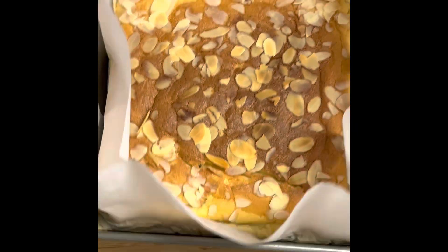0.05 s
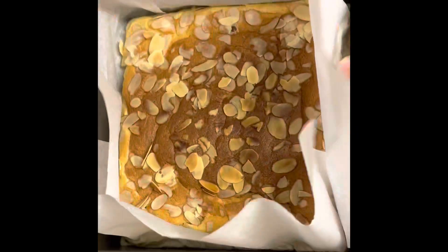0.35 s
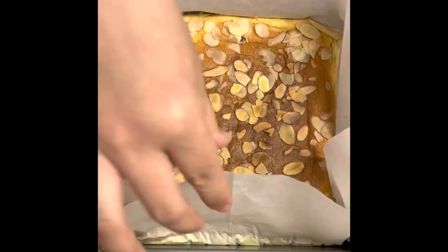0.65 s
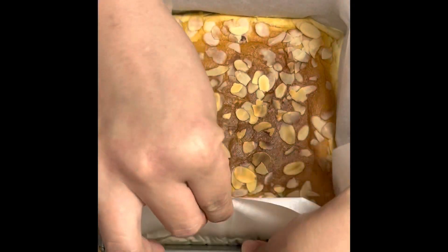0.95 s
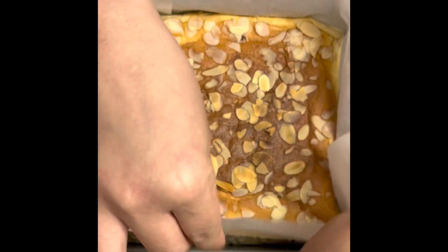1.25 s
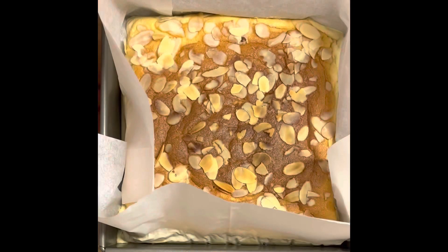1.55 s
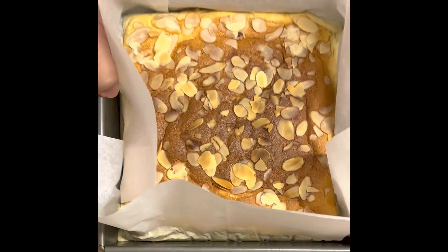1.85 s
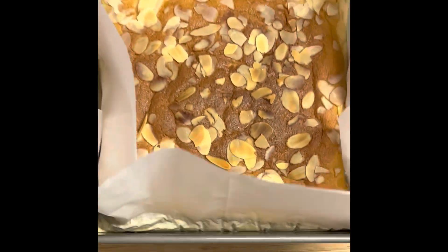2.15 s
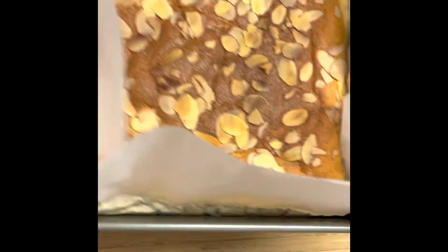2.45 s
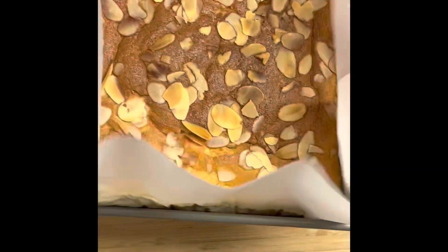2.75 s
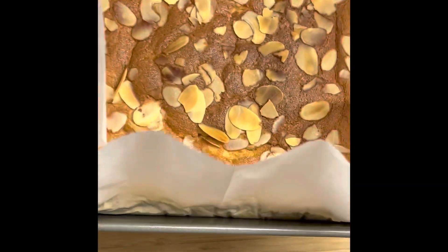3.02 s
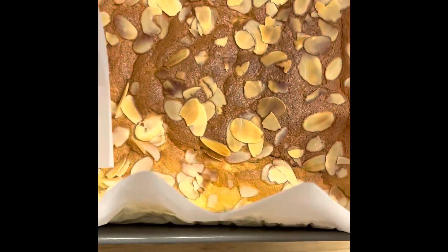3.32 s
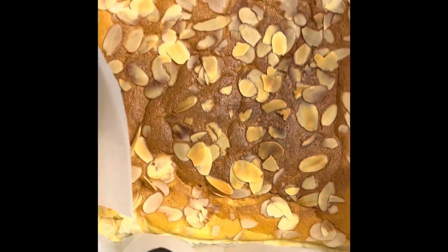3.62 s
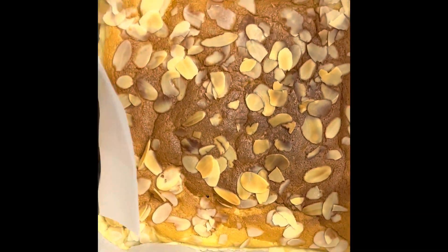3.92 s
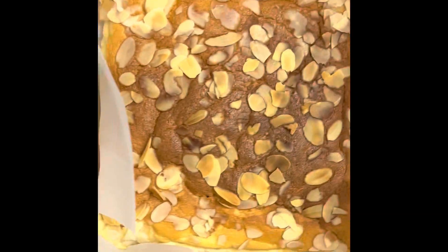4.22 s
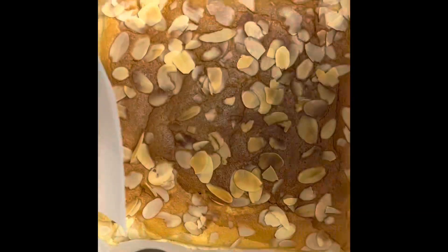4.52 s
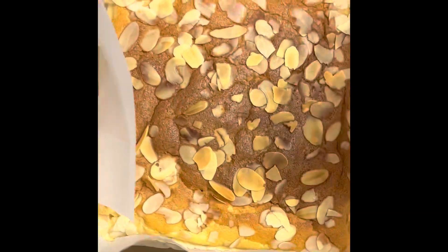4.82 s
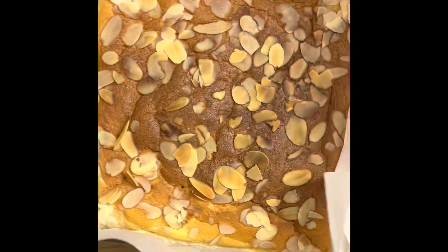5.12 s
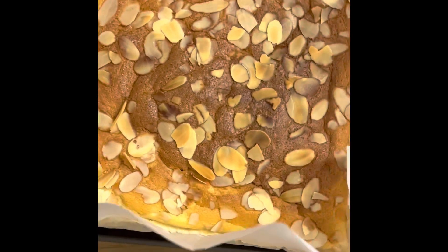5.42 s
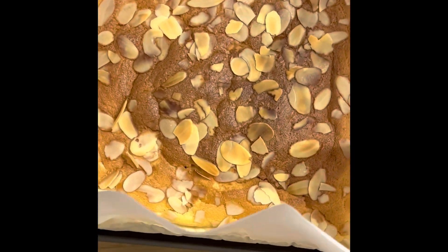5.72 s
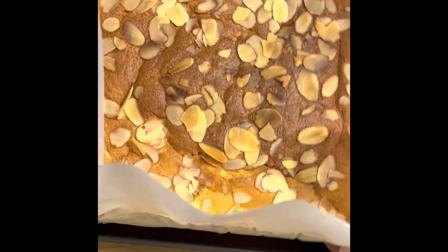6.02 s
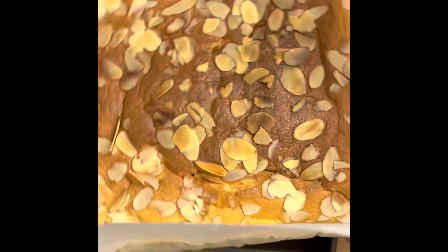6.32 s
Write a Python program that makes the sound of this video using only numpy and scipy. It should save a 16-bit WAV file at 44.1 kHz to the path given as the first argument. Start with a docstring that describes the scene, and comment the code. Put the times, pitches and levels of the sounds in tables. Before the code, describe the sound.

Baking paper crinkles and scrapes in a metal cake tin that knocks on a worktop, over a low appliance hum.

```python
"""Close on a kitchen worktop, small stereo microphone: a sponge cake is eased out of its metal tin.
An appliance hums low in the room throughout. Hands work the baking paper and bump the tin, which
knocks twice on the worktop and rings. The paper crinkles, snaps as creases buckle and scrapes along
the tin's wall. About four seconds in, the tin is set down with a clack; then the loaded sheet slides
hissing over the rim."""
import sys
import numpy as np
from scipy import signal
from scipy.fft import rfft, irfft, next_fast_len
from scipy.io import wavfile
from scipy.ndimage import uniform_filter1d

SR = 44100
rng = np.random.default_rng(int(sys.argv[2]) if len(sys.argv) > 2 else 0)


def unload_audio(sound):
    """Save the sound as a 16-bit wav file, at the path given as the first command line argument."""
    columns = np.transpose(np.atleast_2d(sound))
    # keep every value between -1 and 1, then stretch to whole-number steps
    steps = np.round(np.clip(columns, -1, 1) * 32767)
    wavfile.write(sys.argv[1], SR, steps.astype(np.int16))


N = 280917

# the tin strikes the worktop: (time [s], thud [dB], thud pitch [Hz], clack [dB], clack pitch [Hz],
# worktop boom [dB], gap to the first rebound [s], loss per rebound [dB])
KNOCKS = [(0.2996, 20.5, 616, 19, 3100, 21, 0.012, 6), (0.5180, 33.5, 397, 17, 1320, 26, 0.012, 6),
          (2.53, 14, 397, -1, 987, -10, 0.009, 12), (4.05, 28.5, 657, 24, 1300, 20.5, 0.022, 12),
          (4.1, 23.5, 705, 12.5, 1524, 8, 0.012, 6), (4.1056, 27, 444, 22, 3000, 10, 0.0135, 3),
          (4.597, 6.5, 410, 0, 1600, 4, 0.021, 21)]
# a hand bumps the tin: (time [s], thud [dB], thud pitch [Hz])
BUMPS = [(0.0845, 16.5, 274), (1.063, 3, 390), (1.6, 14, 470), (2.297, 2, 384), (2.4382, 4, 540),
         (5.015, 3, 483), (5.082, 5, 390), (6.2608, 13.5, 340)]
# paper dragged against the tin's wall: (start [s], end [s], level [dB])
SCRAPES = [(1.583, 1.615, -45), (1.696, 1.766, -48), (1.8427, 1.879, -52.5), (2.128, 2.164, -49.5),
           (2.256, 2.268, -56), (2.313, 2.329, -55.5), (3.052, 3.152, -57)]
# tone of a buckling crease: (frequency [Hz], gain [dB])
SNAP_COLOUR = [(100, 9.5), (400, 3.5), (1000, 0), (1900, 1.5), (3500, 8), (5000, 4.5), (7000, 10.5),
               (10000, 11.5), (15500, 4)]


def from_db(db):
    return 10 ** (np.asarray(db) / 20)


def unit_rms(x):
    return x / np.sqrt(np.mean(x ** 2) + 1e-20)


def at_hz(points, size):
    """A spectrum table on the bins of a transform."""
    hz, value = np.transpose(points)
    bins_hz = np.arange(size // 2 + 1) * SR / size
    return np.interp(np.log(bins_hz + 1), np.log(hz), value)


def coloured(x, spectrum):
    """Causal (minimum-phase) filter with the given spectrum."""
    size = 2 * next_fast_len(x.shape[-1] // 2 + 4096)
    cepstrum = irfft(np.log(from_db(at_hz(spectrum, size))))
    cepstrum[1:size // 2] *= 2
    cepstrum[size // 2 + 1:] = 0
    return irfft(rfft(x, size) * np.exp(rfft(cepstrum)))[..., :x.shape[-1]]


def resonance(x, hz, width_hz):
    """Two-pole resonance with gain 1 at its peak."""
    radius = np.exp(-np.pi * width_hz / SR)
    feedback = [1, -2 * radius * np.cos(2 * np.pi * hz / SR), radius ** 2]
    return signal.lfilter(np.array([1, 0, -1]) * (1 - radius ** 2) / 2, feedback, x + 1e-18)


def low_pass(x, hz, order=2):
    return signal.sosfilt(signal.butter(order, hz, fs=SR, output="sos"), x)


def drift(per_s):
    """A random wavering with spread 1."""
    knots = rng.standard_normal(4000)
    return unit_rms(np.interp(np.arange(N) / SR * per_s, np.arange(len(knots)), knots))


def stereo_noise(size):
    """White noise at the microphone's two ports: alike in the bass, nearly unrelated in the treble."""
    # likeness of left and right: (frequency [Hz], correlation [0-1])
    likeness = [(130, .999), (300, .985), (640, .93), (1400, .7), (3100, .8), (5000, .3), (15000, .15)]
    mid, side = rfft(rng.standard_normal((2, 2 * size)))
    alike = at_hz(likeness, 2 * size)
    return irfft(np.sqrt(1 + alike) * mid + np.sqrt(1 - alike) * side * [[1], [-1]])[:, :size]


def scatter(t60):
    """A dense stereo response of unit energy that dies by 60 dB in t60 seconds."""
    noise = stereo_noise(size=32768)
    response = noise * from_db(-60 * np.arange(noise.shape[1]) / SR / t60)
    return response[:, :int(t60 * SR) + 1] / np.sqrt(np.sum(response ** 2) / 2)


def through(x, response):
    return signal.oaconvolve(np.atleast_2d(x), response, axes=1)[:, :N]


def add(track, time_s, sound):
    at = max(round(time_s * SR), 0)
    track[..., at:at + sound.shape[-1]] += sound[..., :N - at]


def pressure(spans, fade_s):
    """Envelope of strokes (start [s], end [s], level [dB]) that swell and fade smoothly."""
    power = np.zeros(N)
    for start, end, db in spans:
        arch = np.sin(np.linspace(0, np.pi, round((end - start + fade_s) * SR)))
        add(power, start - fade_s / 2, from_db(db) ** 2 * arch * np.pi / 2)
    return np.sqrt(np.abs(uniform_filter1d(power, size=int(fade_s * SR) + 1)))


def grains(per_s, spread_db, t60):
    """Tiny random slips, each on one of six facets of the sheet; level about 1."""
    sizes = from_db(spread_db * np.minimum(rng.exponential(1, N), 4)) * rng.choice([-1, 1], N)
    clicks = sizes * (rng.random(N) < per_s / SR)
    clicks /= np.sqrt(np.abs(uniform_filter1d(clicks ** 2, size=3000)) + 1e-4)   # even out the level
    facet = rng.integers(0, 6, N)
    return sum(through(clicks * (facet == k), scatter(t60)) for k in np.unique(facet))


def appliance_hum(level_db=-49.5):
    """Steady low drone of an appliance in the room, with a little air hiss."""
    # tone of the drone: (frequency [Hz], gain [dB])
    hum_colour = [(25, -20.5), (48, -31.5), (72, -7.5), (83, -9.5), (110, -2), (145, -8.5), (190, 1.5),
                  (260, -1.5), (325, 2), (365, -11.5), (480, -14), (750, -19), (3500, -30), (6000, -41.5),
                  (16000, -56)]
    return from_db(level_db) * unit_rms(coloured(stereo_noise(N), hum_colour))


def between_walls(x, reflection, round_trips_per_s=792):
    """Sound bounces between opposite walls of the tin: a hollow series of resonances."""
    size = 2 * next_fast_len(N // 2 + 4096)
    hz = np.arange(size // 2 + 1) * SR / size
    echo = reflection * np.exp(-2j * np.pi * hz / round_trips_per_s)
    return irfft(rfft(x, size) * np.sqrt(1 - reflection ** 2) / (1 - echo))[..., :N]


def paper_rustle(rub_db=-2, drag_db=-2, crease_db=-6, busy_db=-55, uneven_db=2.5, fade_s=0.016):
    """Paper rubs on cake and wall; its wrinkles crackle faster the harder it is worked."""
    # hands on the paper: (start [s], end [s], crinkling [dB], dull rubbing over the crinkling [dB])
    strokes = [(0.0, 0.04, -68, 13.5), (0.167, 0.222, -64, -3), (0.394, 0.422, -53, 4.5),
               (0.474, 0.538, -57.5, 5), (0.58, 0.703, -52.5, 2.5), (0.817, 0.925, -50.5, -5),
               (1.036, 1.087, -46.5, -1), (1.138, 1.265, -58.5, 2), (1.434, 1.497, -60.5, 3),
               (1.578, 1.683, -59.5, 3.5), (1.7, 1.87, -66.5, 1), (2.06, 2.108, -65, 5),
               (2.31, 2.357, -59, -11), (2.383, 2.488, -66, 16.5), (2.725, 2.79, -40.5, -6.5),
               (2.686, 2.93, -55, 1.5), (3.01, 3.132, -64, 5), (3.318, 3.4, -63.5, 1.5),
               (3.754, 3.975, -58.5, -0.5), (4.558, 4.661, -45, 3.5), (4.707, 4.93, -50.5, -2),
               (4.984, 5.064, -40, -3), (5.05, 5.254, -54.5, 2), (5.5, 5.96, -70.5, 6),
               (6.098, 6.099, -52.5, -2.5), (6.223, 6.362, -65.5, 11)]
    rubbing = pressure([(start, end, db + over_db) for start, end, db, over_db in strokes], fade_s)
    rubbing += from_db(drag_db) * pressure(SCRAPES, fade_s)
    crinkling = pressure([(start, end, db) for start, end, db, _ in strokes], fade_s)
    busy = np.sqrt(crinkling / from_db(busy_db))
    # tone of the rubbing: (frequency [Hz], gain [dB])
    rub_colour = [(100, -19.5), (300, 11), (480, 16.5), (750, -4.5), (1100, 4), (1450, 4.5), (1900, -7.5),
                  (2600, 2.5), (3300, -8.5), (4100, 2.5), (5200, -12.5), (6500, -25), (9000, -1.5),
                  (16000, -76.5)]
    rub = coloured(grains(per_s=2000, spread_db=5.5, t60=0.011), rub_colour)
    rub = between_walls(rub, reflection=0.076)
    # tone of the wrinkles: (frequency [Hz], gain [dB])
    crinkle_colour = [(200, -32.5), (1000, 6), (3000, -0.5), (7000, 5), (10000, 2.5), (13000, 0.5),
                      (15500, -7.5)]
    crinkle = coloured(grains(per_s=900 * busy + 200, spread_db=1.0, t60=0.0024), crinkle_colour)
    creases = coloured(grains(per_s=40, spread_db=1.5, t60=0.032), SNAP_COLOUR)
    creases /= np.maximum(busy, 1)   # a taut sheet has less slack to buckle
    crackle = from_db(uneven_db * drift(per_s=69)) * unit_rms(crinkle) + from_db(crease_db) * creases
    return from_db(rub_db) * rubbing * unit_rms(rub) + crinkling * crackle


def tin_contacts(gap_share=0.79, rebound_clack_db=-9.5, hand_clack_hz=1210):
    """Every touch of the tin: a knock with four dying rebounds, or one soft bump."""
    for time_s, thud_db, thud_hz, clack_db, clack_hz, boom_db, gap_s, loss_db in KNOCKS:
        for k in range(5):
            lost_db = k * loss_db
            landing_db = clack_db + rebound_clack_db * (k > 0)   # rebounds land flatter: less clack
            yield time_s, thud_db - lost_db, thud_hz, landing_db - lost_db, clack_hz, boom_db - lost_db
            time_s += gap_s * gap_share ** k   # each comes sooner than the last
    for time_s, thud_db, thud_hz in BUMPS:
        # a hand is soft: its clack and boom lie far below its thud
        yield time_s, thud_db, thud_hz, thud_db - 36.5, hand_clack_hz, thud_db - 13


def dispersed(x, stiffness):
    """Bending waves in sheet metal spread a blow out in time, treble first."""
    all_pass = [-stiffness, 1, 0, 1, -stiffness, 0]
    return signal.sosfilt(np.tile(all_pass, (8, 1)), x)


def ringing(x, modes):
    """A body's decaying modes, driven by x."""
    return sum(from_db(db) * resonance(x, hz, np.log(1000) / (np.pi * t60)) for hz, db, t60 in modes)


def tin_knocks(chatter_db=-20, rattle_db=-3, wash_db=-11):
    """A soft thud and a hard clack set the tin's modes and a metallic wash going; the worktop booms."""
    # ringing of the tin: (frequency [Hz], gain over the blow [dB], t60 [s])
    tin_modes = [(161, 7.5, 0.11), (277, 1.5, .1), (332.5, 5, 0.089), (455.3, 3, 0.15), (544, 0.5, 0.1),
                 (1917, 2, 0.36), (694, 4, 0.066), (794, 4.5, 0.17), (896, 2, 0.15), (1425, 0, 0.36),
                 (995, 3, 0.067), (1050, 0, 0.062), (579, -2.5, 0.089), (1307, 8.5, 0.044),
                 (1500, 9.5, 0.06), (1710, -6.5, 0.15), (2111, 5, 0.18), (2210, 2.5, 0.2), (2430, 10, .11),
                 (2490, 5.5, 0.099), (2600, -0.5, 0.17), (2767, -1.5, 0.16), (3050, 2, 0.11),
                 (3130, -1.5, 0.1), (3480, -4, 0.15), (3690, 7, 0.056), (3880, 7.5, 0.035),
                 (4430, 0.5, 0.076), (5030, 1.5, 0.11), (6130, -1, .04)]
    # the worktop under it: (frequency [Hz], gain [dB], t60 [s])
    worktop_modes = [(117.1, 13.5, 0.32), (170, 0, 0.15)]
    blows, chatter, shoves = np.zeros((3, N))
    click = signal.unit_impulse(4096)
    rim_tick = low_pass(resonance(click, hz=7400, width_hz=2000), hz=10000)
    for time_s, thud_db, thud_hz, clack_db, clack_hz, boom_db in tin_contacts():
        thud = low_pass(resonance(click, thud_hz, width_hz=0.53 * thud_hz), 1.47 * thud_hz)
        clack = low_pass(resonance(click, clack_hz, width_hz=clack_hz), 1.33 * clack_hz)
        clack = dispersed(clack, stiffness=0.796)
        add(blows, time_s, from_db(thud_db) * thud + from_db(clack_db) * clack)
        add(chatter, time_s, from_db(clack_db + chatter_db) * rim_tick)   # heard only in the wash
        add(shoves, time_s, from_db(boom_db) * resonance(click, hz=136, width_hz=160))
    upper = blows - low_pass(blows, hz=350, order=1) + 2 * chatter   # modes crowd only higher up
    rattle = from_db(rattle_db) * through(upper, scatter(t60=0.056))
    wash = from_db(wash_db) * through(upper, scatter(t60=0.1))
    hollow_wash = between_walls(rattle + wash, reflection=0.14)
    return blows + ringing(blows, tin_modes) + hollow_wash + ringing(shoves, worktop_modes)


def crease_snaps(jolt_db=-28, jolt_dullness=0.73, release_db=36.5, release_dullness=0.74):
    """A crease flips by itself, at a jolt or as a scrape breaks free; the sheet shivers briefly."""
    # big creases that buckle: (time [s], level [dB], dullness [0-1])
    buckles = [(0.401, -19, 0.1), (0.657, -22.5, 0.03), (0.8493, -19.5, 0.57), (0.892, -11, 0.07),
               (0.9496, -13, 0.66), (1.024, -14, 0.33), (1.0938, -14.5, 0.52), (1.14, -21.5, 0.5),
               (1.1554, -17, 0.2), (1.248, -20, 0.08), (1.4373, -15.5, 0.8), (1.5994, -14, 0.2),
               (2.0124, -30.5, 0.02), (2.141, -16.5, 0.78), (2.7104, -16.5, 0.1), (2.746, -12, 0.15),
               (2.9047, -9.5, 0.53), (2.977, -21, 0.35), (4.4117, -25.5, 0), (4.5553, -20, 0.02),
               (4.5762, -9, 0.06), (4.5963, -9.5, 0.02), (4.765, -19, 0.56), (4.988, -14.5, 0.05),
               (5.0129, -10, 0.02), (5.079, -14, 0.5), (5.1564, -13.5, 0.71), (5.214, -19.5, 0.2),
               (5.6763, -19.5, 0.27), (6.1071, -12, 0.52), (6.1706, -12.5, 0.71)]
    jolts = [(time_s, thud_db + jolt_db, jolt_dullness) for time_s, thud_db, *_ in KNOCKS + BUMPS]
    releases = [(start, db + release_db, release_dullness) for start, _, db in SCRAPES]
    snaps = np.zeros((2, N))
    for time_s, level_db, dullness in buckles + jolts + releases:
        shiver = signal.lfilter([1 - dullness], [1, -dullness], scatter(t60=0.035))
        add(snaps, time_s, from_db(level_db) * shiver)
    return coloured(snaps, SNAP_COLOUR)


def wall_scrapes():
    """Quick slips of paper along the tin's wall ring in a few narrow resonances."""
    # resonances of the scraping: (frequency [Hz], width [Hz], gain [dB])
    squeak_bands = [(1210, 47, -2), (1515, 42, 5.5), (1600, 42, 2), (2040, 62, -1), (2580, 92, 6),
                    (3310, 110, 0), (3700, 54, -22), (4120, 75, 3.5), (4920, 32, -5), (6150, 65, -1),
                    (6930, 100, -4), (7400, 54, -19)]
    slips = grains(per_s=1500, spread_db=0, t60=0.0078)
    squeak = sum(from_db(db) * resonance(slips, hz, width_hz) for hz, width_hz, db in squeak_bands)
    return pressure(SCRAPES, fade_s=0.0033) * unit_rms(squeak)


def rim_slide(gain_db=11, judder_db=0.5, catch_share=0.6, sheen_from_hz=6000, fade_s=0.036):
    """Fine stick and slip over the rim hisses in the resonances of the taut sheet."""
    # the loaded sheet slides: (start [s], end [s], level [dB], treble sheen over that level [dB])
    slides = [(4.46, 4.92, -57.5, 6), (4.951, 5.596, -59.5, 4), (5.73, 6.136, -68, -4.5),
              (6.223, 6.382, -53, -14)]
    # resonances of the sheet: (frequency [Hz], width [Hz], gain [dB])
    sheet_bands = [(1230, 360, -6), (3000, 33, -11.5), (3220, 130, 1.5), (4060, 790, -4.5),
                   (6460, 3800, -16), (8300, 290, -8), (9770, 260, 0.5), (14900, 3600, -7)]
    body = pressure([(start, end, db) for start, end, db, _ in slides], fade_s)
    sheen = pressure([(start, end, db + sheen_db) for start, end, db, sheen_db in slides], fade_s)
    hiss = stereo_noise(N)
    catches = unit_rms(grains(per_s=180, spread_db=7, t60=0.008))   # rough spots catch now and then
    friction = (hiss + catch_share * catches) * from_db(gain_db + judder_db * drift(per_s=70))
    return sum(from_db(db) * resonance(friction, hz, width_hz) * (sheen if hz > sheen_from_hz else body)
               for hz, width_hz, db in sheet_bands)


def scene(near_db=-10, near_t60=0.17, room_db=-22, room_t60=0.36):
    """Paper sounds bounce around the worktop; paper and tin get a faint kitchen tail over the hum."""
    paper = crease_snaps() + paper_rustle() + wall_scrapes() + rim_slide()
    close = tin_knocks() + paper + from_db(near_db) * through(paper, scatter(near_t60))
    kitchen_tail = from_db(room_db) * through(close, scatter(room_t60))
    return close + kitchen_tail + appliance_hum()


def record(dry, lag_samples=2, ceiling=0.88, low_cut_hz=68, high_cut_hz=16000):
    """A small stereo microphone: two ports, each with its own colour, the right one slightly late."""
    # balance of the ports: (frequency [Hz], left minus right [dB])
    balance = [(100, -.3), (350, -1.8), (700, -2.6), (1100, -3.8), (1900, 0), (4000, .4), (15000, 0)]
    size = 2 * next_fast_len(N // 2 + 4096)
    port_gains = from_db(at_hz(balance, size) * [[0.5], [-0.5]])
    left, right = irfft(rfft(dry, size) * port_gains)[:, :N]
    ports = np.array([left, np.pad(right, (lag_samples, 0))[:N]])
    ports -= resonance(ports, hz=12000, width_hz=3000)   # a notch in the treble
    ports = ceiling * np.tanh(ports / ceiling)   # peaks are rounded
    ports = signal.sosfilt(signal.butter(2, low_cut_hz, "high", fs=SR, output="sos"), ports)
    return signal.sosfilt(signal.ellip(10, 0.3, 80, high_cut_hz, fs=SR, output="sos"), ports)


dry = scene()
out = record(dry)
unload_audio(out)
```